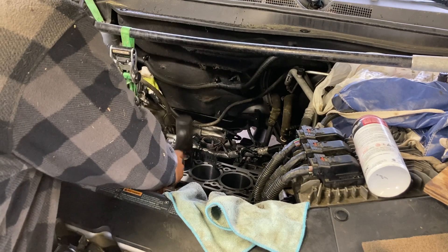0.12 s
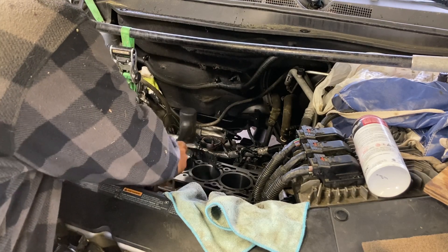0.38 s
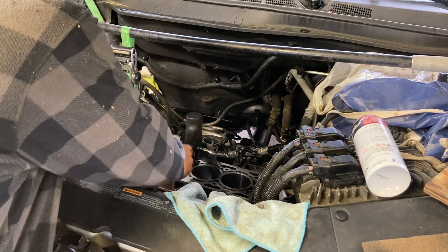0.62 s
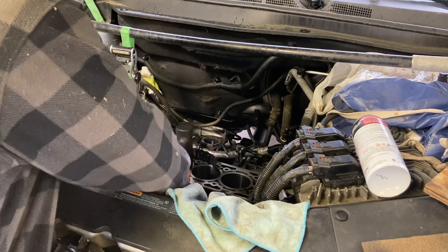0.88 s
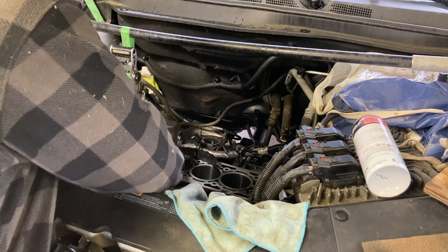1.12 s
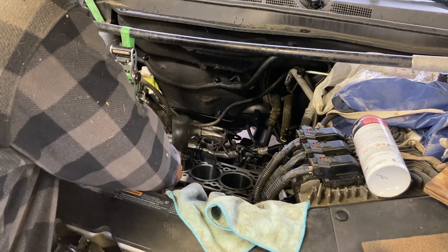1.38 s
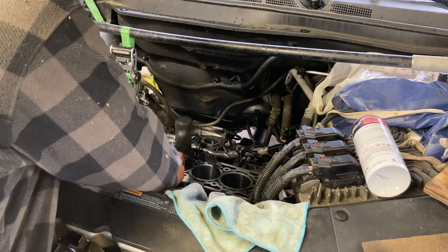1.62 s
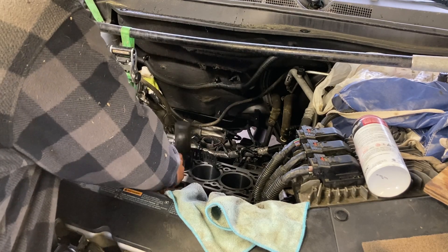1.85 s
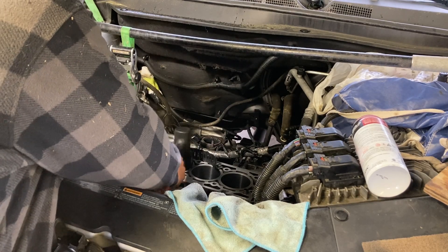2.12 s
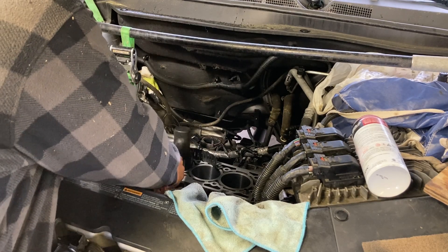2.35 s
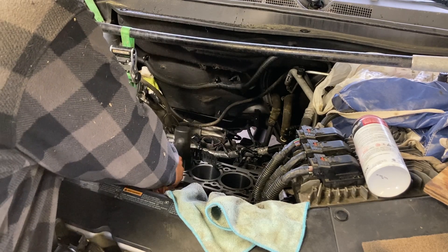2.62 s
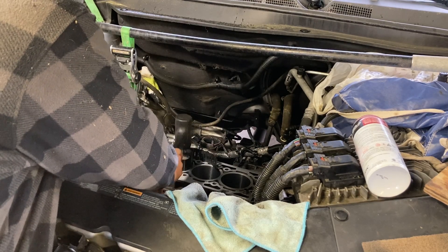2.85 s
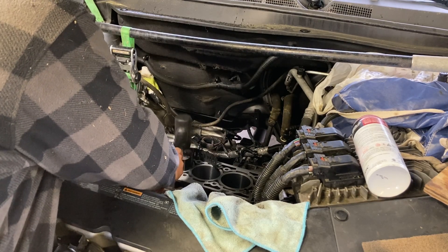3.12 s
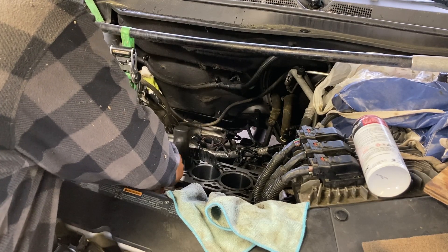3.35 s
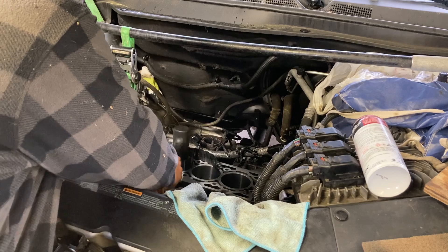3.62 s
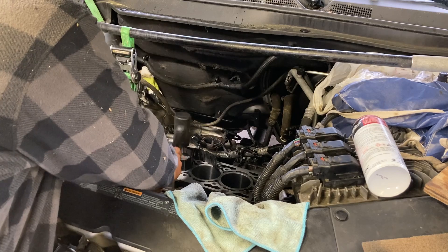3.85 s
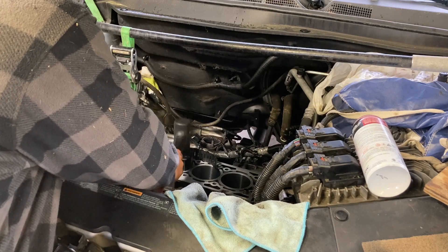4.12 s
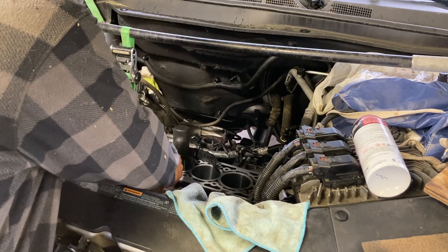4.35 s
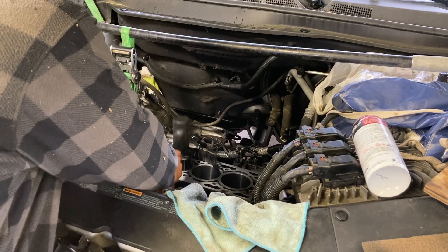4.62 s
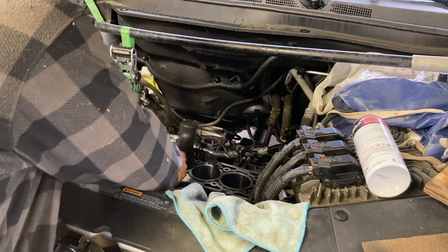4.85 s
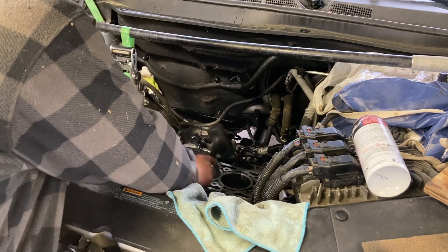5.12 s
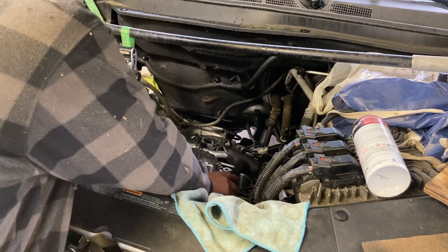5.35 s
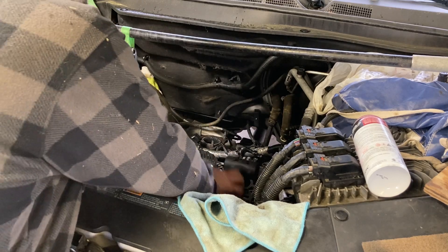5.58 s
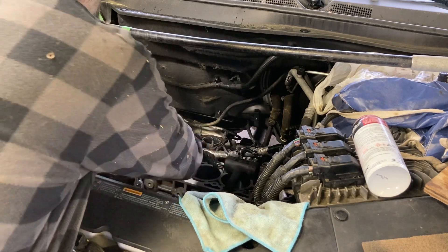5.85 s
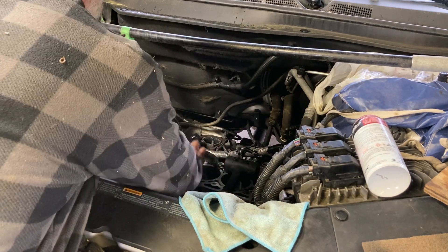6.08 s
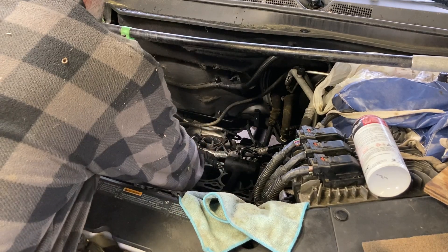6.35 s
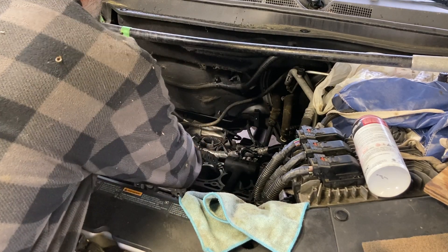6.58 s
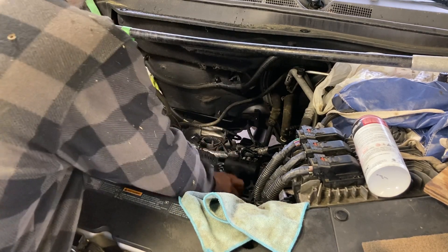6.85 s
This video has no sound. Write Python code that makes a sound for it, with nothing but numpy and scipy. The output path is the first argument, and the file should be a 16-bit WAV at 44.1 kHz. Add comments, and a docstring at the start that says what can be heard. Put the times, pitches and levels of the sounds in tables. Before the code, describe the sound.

Light taps grow into steady hard knocks on an engine part, each with a short low ring, ending in a dull clunk and cloth rustle.

```python
"""Taps, first light, then firm, over a low outdoor rumble with sleeve rustles, in a closed garage.
A mallet handle taps a piston down its bore in an engine block; the mallet is then laid down.
Each tap is a noise crack plus decaying sines: a low beating tone of block and body panels and a thin steel ring.
Small ticks and the mallet are clicks and short rings; rustle, rumble and echo are shaped noise.
Two microphone ports hear it all a little apart."""
import sys
import numpy as np
from scipy import signal
from scipy.fft import rfft, irfft
from scipy.io import wavfile
from scipy.ndimage import uniform_filter1d

SR = 44100
rng = np.random.default_rng(int(sys.argv[2]) if len(sys.argv) > 2 else 0)


def ratio(d):
    """dB to gain"""
    e = np.asarray(d, float) / 20
    return 10 ** e


def store_wav(level_fs):
    """Save 16-bit WAV to argv[1]."""
    pcm = np.round(np.clip(np.atleast_2d(level_fs), -1, 1) * 32767)
    wavfile.write(sys.argv[1], SR, pcm.T.astype(np.int16))


N = 307377
LEAD = SR // 2  # samples computed ahead of t = 0, cut off in scene()
TOTAL = N + LEAD
HZ = np.fft.rfftfreq(TOTAL, 1 / SR) + 1e-3  # offset keeps log(HZ) finite
BURST_LEN = 8192  # samples


def on_log(table, hz, column=1):
    """Read a table along a log-frequency axis."""
    table = np.array(table, float)
    return np.interp(np.log(hz), np.log(table[:, 0]), table[:, column])


def shape(sound, gain):
    """Multiply the spectrum by a gain per frequency."""
    return irfft(rfft(sound, TOTAL) * gain, TOTAL)


def unit(sound, seconds=0.018):
    """Scale to rms 1 over the first moments."""
    return sound / np.sqrt(np.mean(sound[:int(seconds * SR)] ** 2))


def ring(modes, scatter_db=0., seconds=.6, push_s=0.0022):
    """Decaying sines after a soft push; each blow shares its force a little differently among the modes."""
    modes = np.array(modes, float)
    t = np.arange(int(seconds * SR)) / SR
    gain = ratio(modes[:, 1] + scatter_db * rng.standard_normal(len(modes)))
    if modes.shape[1] > 3:
        gain = gain * modes[:, 3]  # polarity
    decay = np.exp(-np.log(1000) * t / modes[:, 2:3])
    sines = np.sin(2 * np.pi * modes[:, :1] * t)
    push = 1 - np.exp(-(t / push_s) ** 2)
    return push * unit(gain @ (sines * decay))


def burst(rise_s, fall_s):
    """A short spit of noise with exponential rise and fall."""
    t = np.arange(BURST_LEN) / SR
    return rng.standard_normal(BURST_LEN) * (1 - np.exp(-t / rise_s)) * np.exp(-t / fall_s)


def add(track, sound, s):
    """Mix a sound in at a time in seconds."""
    i = LEAD + int(s * SR)
    track[i:i + len(sound)] += sound[:len(track) - i]


def walk(rate_hz):
    """Random levels held 1 / rate_hz s and slewed twice."""
    hold = int(SR / rate_hz)
    levels = np.repeat(rng.standard_normal(TOTAL // hold + 1), hold)
    return 1.2 * uniform_filter1d(uniform_filter1d(levels, hold), hold)[:TOTAL]


def diffuse(length):
    """Noise for both ports, with a likeness that depends on frequency."""
    # likeness of diffuse sound at both ports: f/Hz, correlation/1
    likeness = [(60, 0.88), (300, 1), (700, 0.067), (5000, .2), (7000, 0.99)]
    c = np.clip(on_log(likeness, HZ), 0, 1)
    mid, side = rng.standard_normal((2, length))
    mid = shape(mid, np.sqrt((1 + c) / 2))
    side = shape(side, np.sqrt((1 - c) / 2))
    return np.array([mid + side, mid - side])[:, :length]


def ports(sound, lead):
    """Two ports hear each frequency a little apart in time: half the phase lead goes to each side."""
    turn = np.exp(.5j * np.interp(HZ, *np.transpose(lead)))
    return np.array([shape(sound[0], turn), shape(sound[1], 1 / turn)])


def rumble():
    """Distant traffic through the walls: noise in overlapping octave-spaced bands that waver alone."""
    # rumble spectrum, relative: f/Hz, density/dB per Hz
    spectrum = [(15, -39), (25, -8.5), (70, 2.5), (105, -3.5), (198, -16.5), (754, -22), (1760, -30.5),
                (2180, -36.5), (7450, -49), (9260, -54), (10100, -49), (11500, -47.5), (13600, -59.5),
                (15100, -51.5), (16900, -68.5)]
    rms_db, waver_db, waver_hz = -54.5, 3.0, 8.5
    noise, out = diffuse(TOTAL), 0
    colour = ratio(on_log(spectrum, HZ))
    for hz in 30 * 2 ** np.arange(0, 9.5, 1):
        band = np.exp(-(np.log2(HZ / hz) / 2.1) ** 2)
        out = out + shape(noise, colour * band) * ratio(waver_db * walk(waver_hz))
    return out * ratio(rms_db) / np.sqrt(np.mean(out ** 2))


def garage():
    """Echo of walls and engine bay: noise dying away band by band."""
    # reverberation: f/Hz, t60/s, level/dB
    reverb = [(300, 0.43, 4), (1000, 0.43, -9), (2950, 0.36, -9.5), (8000, 0.3, -11), (15000, 0.27, -20)]
    t = np.arange(SR // 2) / SR
    noise, out = diffuse(len(t)), 0
    for hz in 125 * 2 ** np.arange(0, 7.1, .5):
        band = shape(noise, np.exp(-(np.log2(HZ / hz) / 0.36) ** 2))[:, :len(t)]
        t60_s = on_log(reverb, hz)
        decay = ratio(on_log(reverb, hz, column=2) - 60 * t / t60_s)
        out = out + band * decay / np.sqrt(t60_s * SR / 14)  # longer decays start lower
    return out * (1 - np.exp(-t / .004))


def rustle():
    """Sleeve cloth rubbing: bright noise in uneven grains; each rub swells, holds and dies."""
    # rubs: start/s, hold/s, level/dB
    rubs = [(0.85, 0.026, -61), (1.004, .03, -65.5), (2.865, 0.049, -70.5), (4.185, 0.055, -73.5),
            (5.28, .025, -68.5), (5.32, 0.45, -73.5), (5.803, 0.091, -67), (6.625, .015, -89.5),
            (6.85, .12, -78.5)]
    # cloth spectrum, relative: f/Hz, density/dB per Hz
    cloth = [(880, -28), (1500, -8), (5650, -10.5), (7810, -9.5), (9280, -11), (11700, -7.5),
             (15900, -16.5), (16900, -46.5)]
    rise_s, fall_s, grain_db, grain_hz = 0.022, .015, 3., 160
    t = (np.arange(TOTAL) - LEAD) / SR
    gain = 0
    for s, hold_s, db in rubs:
        slope = np.minimum((t - s) / rise_s, (s + hold_s - t) / fall_s)
        gain = gain + ratio(db) * np.exp(np.minimum(0, slope))
    grains = rng.standard_normal(TOTAL) * ratio(grain_db * walk(grain_hz))
    return gain * unit(shape(grains, ratio(on_log(cloth, HZ))), seconds=6)


def ticks():
    """Tool on metal: small clicks with a body a few cycles of its centre long, and a bright edge."""
    # ticks: t/s, level/dB, centre f/Hz
    clicks = [(0.1506, -45, 2640), (0.3144, -56.5, 2990), (0.7298, -51.5, 2960), (4.8469, -51, 2666),
              (5.9968, -59, 1720), (6.9144, -69, 1662)]
    fall_cycles, edge_db = 9., -4
    out = np.zeros(TOTAL)
    for s, db, hz in clicks:
        click = burst(0.00027, fall_cycles / hz)
        body = signal.lfilter(*signal.iirpeak(hz, 1.5, SR), click)
        add(out, ratio(db) * unit(body), s)
        add(out, ratio(db + edge_db) * unit(np.diff(click, 2)), s)
    return out


def mallet():
    """The mallet lands on the block and bounces once: a dull click and a short wooden ring."""
    # landings: t/s, level/dB
    landings = [(5.454, -32), (5.647, -46.5)]
    # mallet modes: f/Hz, level/dB, t60/s
    wood = [(340, -2, .09), (352, -8, .2), (480, -6, .06), (570, -4, .07), (680, -4, .06), (760, -2, .07),
            (880, -7, .08), (1250, 0, .03)]
    click_db, click_delay_s = -11, 0.0011  # both against the ring
    out = np.zeros(TOTAL)
    for s, db in landings:
        add(out, ratio(db) * ring(wood, scatter_db=2.), s)
        click = signal.lfilter(*signal.butter(2, 1800, fs=SR), burst(0.00024, 0.00717))
        add(out, ratio(db + click_db) * unit(click), s + click_delay_s)
    return out


def body_thud():
    """The car body gives on its mounts: a low sway that builds up late."""
    # mount modes: f/Hz, level/dB, t60/s
    mounts = [(63, 0, .35), (77, 0, .3)]
    return ring(mounts, scatter_db=2.5, push_s=0.064)


def bore_walls():
    """The bore walls ring briefly."""
    # wall modes: f/Hz, level/dB, t60/s
    walls = [(1134, -8, .3), (1297, 0, .12)]
    return ring(walls, scatter_db=1.5)


def low_tone():
    """Block and panels ring; the close group near 250 Hz beats, fades and swells again."""
    # block and panel modes: f/Hz, level/dB, t60/s, polarity (+1 or -1)
    panels = [(117.4, -45, 0.45, 1), (140.3, -21, 0.05, -1), (177.9, -34, 0.37, 1), (202.2, -33, 0.25, -1),
              (223.7, -29, 0.29, -1), (233.5, -28, 0.43, -1), (242.4, -16, 0.3, -1), (250.5, -15, 0.36, -1),
              (255.3, 0, 0.07, 1), (258.3, -9, 0.21, -1), (269.2, -17, 0.23, -1), (301.2, -35, 0.35, -1),
              (329.2, -21, 0.16, -1), (357.0, -31, 0.26, -1), (381.5, -19, 0.25, 1), (385.0, -18, 0.18, -1),
              (441.2, -24, 0.05, -1), (480.1, -20, 0.17, -1), (493.6, -14, 0.04, 1), (529.0, -27, 0.33, 1),
              (555.6, -31, 0.29, -1), (571.3, -26, 0.16, -1), (627.4, -34, 0.29, 1), (645.5, -26, 0.19, -1),
              (657.4, -28, 0.18, -1), (698.1, -24, 0.12, -1)]
    return ring(panels, scatter_db=.6)


def crown_ring():
    """The piston crown rings in a close group of modes."""
    # crown modes: f/Hz, level/dB, t60/s
    crown = [(2555, -13, .45), (2654, -14, .3), (2746, -1, .22), (2790, -2, .25), (2826, 0, .22),
             (2929, -10, .27), (2980, -11, .3)]
    return ring(crown, scatter_db=3.)


def sleeve_ring(gap_s):
    """The steel sleeve round the piston rings thinly; the next blow, gap_s later, takes 6 dB from it."""
    # sleeve modes: f/Hz, level/dB, t60/s
    sleeve = [(6444, -24, 1.9), (7397, -2, .22), (7779, -19, 1.), (7989, 0, .62), (8175, -5, .5),
              (11620, 2, .21), (11644, -2, .33), (11790, -2, .28), (12180, 1, .33)]
    sound = ring(sleeve, scatter_db=3., seconds=1.5)
    return sound * np.where(np.arange(len(sound)) < gap_s * SR, 1, ratio(-6))


def crack(lead_in_db):
    """A faint noise swells up to each blow, the blow lands, and loose parts rattle on, new at each tap."""
    rattle_db = -18.5
    lead_in = ratio(lead_in_db) * unit(burst(.0002, .006))[::-1]
    blow = unit(burst(0.0011, 0.0045))
    rattle = ratio(rattle_db) * unit(burst(.003, 0.027))
    return np.r_[lead_in, blow + rattle]


def taps():
    """Each blow drives crack, rings and low tone at its own levels; returns cracks, rings, low tone."""
    # taps: t/s, crack/dB, low tone/dB, crown ring/dB, steel ring/dB; of the first only the tail is heard
    blows = [(-.105, -29, -33.5, -52, -74), (0.195, -26.5, -28.5, -56, -78), (0.4992, -14, -36.5, -50, -42),
             (0.7, -26.5, -42, -55, -56), (0.894, -35, -45.5, -51, -66), (1.0559, -24, -46.5, -52, -84),
             (1.2231, -31.5, -48, -53, -84.5), (1.4395, -15, -21.5, -53, -66), (1.6734, -11, -23, -33, -66),
             (1.8908, -11.5, -22, -33, -53.5), (2.1002, -11, -21.5, -52, -49),
             (2.3481, -6, -21, -32.5, -67), (2.627, -10, -21.5, -56, -61.5),
             (2.949, -9.5, -18.5, -39.5, -60.5), (3.264, -8, -16.5, -42.5, -45.5),
             (3.6138, -6.5, -19, -38, -26.5), (3.9607, -4, -19, -43.5, -38),
             (4.2955, -6, -19.5, -31, -24.5), (4.6724, -9, -21, -38.5, -41.5)]
    # crack spectrum, relative: f/Hz, density/dB per Hz
    crack_colour = [(240, -23.5), (400, -12), (1690, -10), (2460, -10.5), (2740, -8.5), (5050, -15.5),
                    (7470, -10.5), (9160, -3.5), (10100, -6), (11800, -8.5), (13500, -13.5), (15800, -13.5),
                    (16900, -39.5)]
    split_hz, lead_in_mid_db, lead_in_top_db = 6700, -26, -40  # lead-ins against the blow
    walls_db, thud_db = -15, -24  # against the low tone
    mid, top, rings, low = np.zeros((4, TOTAL))
    next_times_s = [blow[0] for blow in blows[1:]] + [N / SR]
    for (s, crack_db, low_db, crown_db, steel_db), next_s in zip(blows, next_times_s):
        # the crack's middle follows both its top and the weight of the blow
        knock_db = 2.5 + .52 * crack_db + .17 * low_db
        lead_in_start_s = s - BURST_LEN / SR
        add(top, ratio(crack_db) * crack(lead_in_top_db), lead_in_start_s)
        add(mid, ratio(knock_db) * crack(lead_in_mid_db), lead_in_start_s)
        add(rings, ratio(crown_db) * crown_ring(), s)
        add(rings, ratio(steel_db) * sleeve_ring(next_s - s), s)
        add(rings, ratio(low_db + walls_db) * bore_walls(), s)
        add(low, ratio(low_db) * low_tone(), s)
        add(low, ratio(low_db + thud_db) * body_thud(), s)
    upper = 1 / (1 + (split_hz / HZ) ** 6)
    colour = ratio(on_log(crack_colour, HZ))
    cracks = shape(mid, colour * (1 - upper)) + shape(top, colour * upper)
    return cracks, rings, low


def scene():
    """Direct sound, garage echo and outdoor rumble at the two ports."""
    # indoor sound, phase by which left leads: f/Hz, lead/rad
    near_lead = [(0, .35), (500, .35), (1200, .6), (2760, 1.4), (4800, 2.9), (5900, 2.5), (6900, .1),
                 (7400, -1), (9200, -3.14), (16100, -12.56)]
    # outdoor sound, phase by which left leads: f/Hz, lead/rad
    far_lead = [(0, 0), (700, -1.4), (5900, 2.5), (6900, .1), (7400, -1), (9200, -3.14), (16100, -12.56)]
    rings_echo_db, low_echo = -6.0, .12  # shares sent round the garage; low_echo is an amplitude ratio
    cracks, rings, low = taps()
    near = cracks + mallet() + ticks() + rustle()
    sent = near + ratio(rings_echo_db) * rings + low_echo * low
    echo = signal.fftconvolve(sent[None], garage(), axes=1)[:, :TOTAL]
    indoors = ports(near + rings + low + echo, near_lead)
    return (indoors + ports(rumble(), far_lead))[:, LEAD:]


def band_limit(x):
    """A steep low-pass at the top of the band."""
    return signal.sosfilt(signal.butter(12, 17020, fs=SR, output="sos"), x)


def record(dry):
    """The microphone loses the deepest bass, below 45 Hz."""
    high_pass = signal.butter(2, 45, "high", fs=SR, output="sos")
    mix = signal.sosfilt(high_pass, dry)
    return band_limit(mix)


dry = scene()
out = record(dry)
store_wav(out)
```